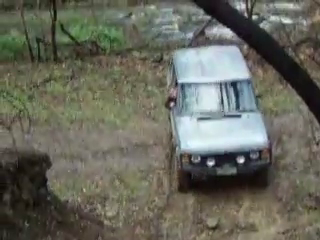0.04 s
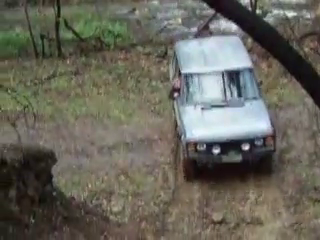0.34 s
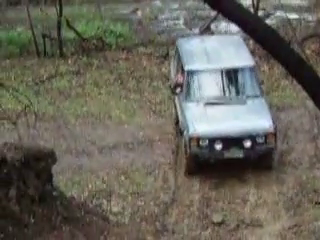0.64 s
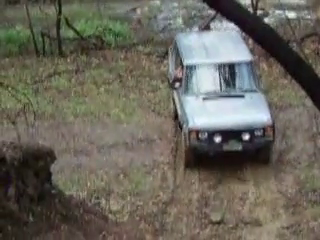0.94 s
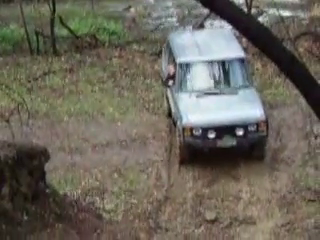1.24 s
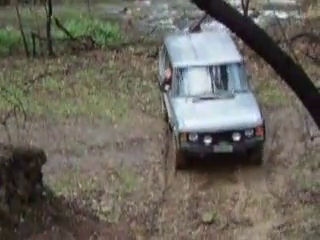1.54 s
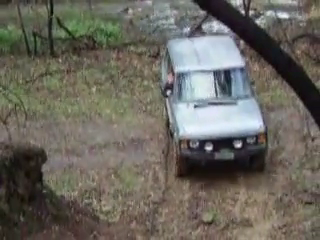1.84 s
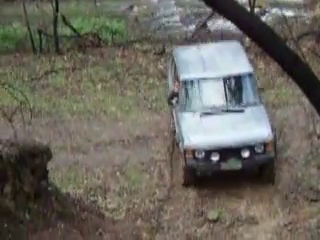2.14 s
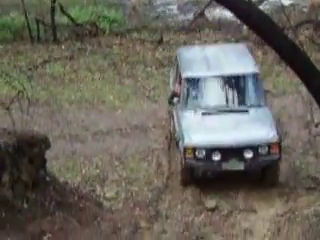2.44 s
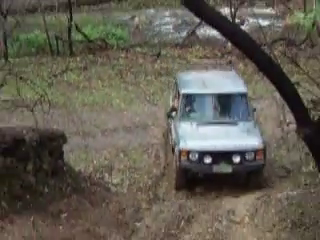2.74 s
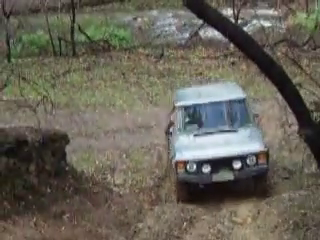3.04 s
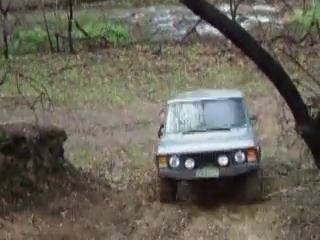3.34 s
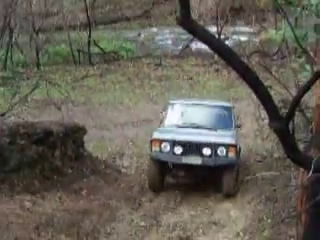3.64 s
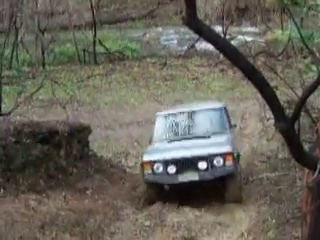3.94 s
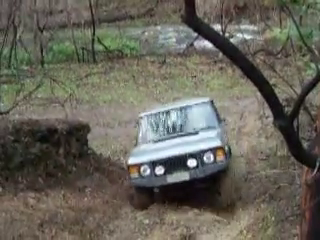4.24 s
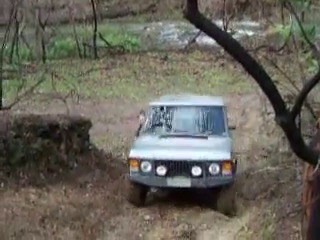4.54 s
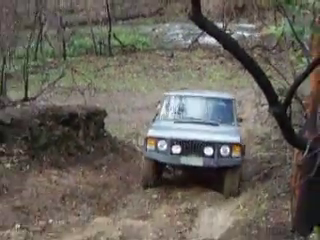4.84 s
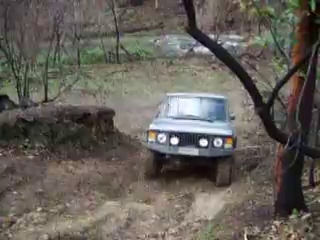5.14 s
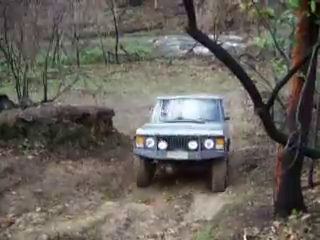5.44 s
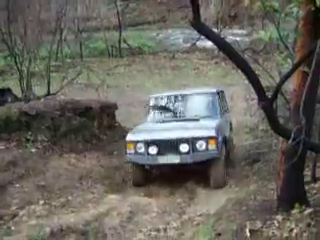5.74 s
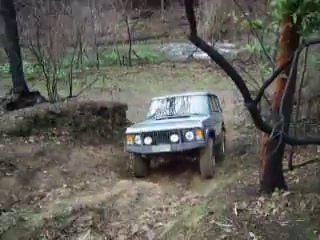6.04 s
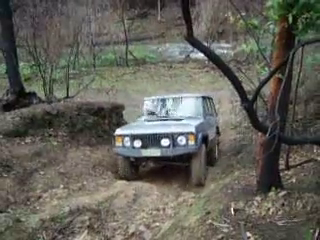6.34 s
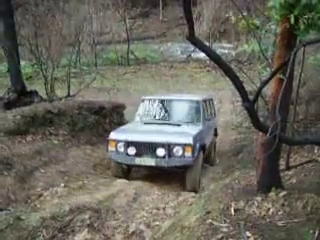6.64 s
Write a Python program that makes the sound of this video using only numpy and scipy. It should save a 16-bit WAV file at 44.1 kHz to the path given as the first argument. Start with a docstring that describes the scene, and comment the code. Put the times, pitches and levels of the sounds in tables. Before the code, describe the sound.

A four-wheel-drive truck's large petrol engine lopes at low revs outdoors, with an uneven burble and a few small pushes of the throttle. Engine clatter, fan rush and tyres churning mud accompany it, over a very faint stream. At about 2 seconds the throttle snaps open and the engine barks, overloading the microphone with a quick cluster of clicks until about 2.4 seconds. The revs climb steeply to a peak near 3.2 seconds, then sag a little and waver under load as the truck comes nearer and grows louder. From about 5 seconds the revs rise again and the exhaust howls, loudest near 6 seconds, while light gusts thud softly on the microphone. After that a lower throb grows in the exhaust, and the engine is still revving high at the end, near 7 seconds. The overall sound has little treble.

```python
"""A petrol V8 truck lopes at the foot of a muddy hill: its two banks fire unevenly, so the exhaust sounds many
multiples (orders) of the engine cycle. The bay clatters, the fan rushes and tyres churn mud over a faint
stream. Near 2 s the throttle snaps open, the engine barks and a burst of sharp clicks sounds. The truck revs up
the track, louder as it nears, and light gusts nudge the microphone. From about 5 s the exhaust howls; at the
top the truck swings sideways and the beat of one bank grows."""
import sys
import numpy as np
from scipy import signal
from scipy.fft import rfft, irfft, next_fast_len
from scipy.io import wavfile
from scipy.ndimage import uniform_filter1d

SR = 44100
rng = np.random.default_rng(int(sys.argv[2]) if len(sys.argv) > 2 else 0)


def waveform_to_disk(signal):
    """Save audio, clipped to [-1, 1], as 16-bit WAV at the path in sys.argv[1]."""
    frames = np.transpose(np.atleast_2d(signal))
    scaled = np.clip(frames, -1, 1) * 32767
    samples = np.round(scaled).astype(np.int16)
    wavfile.write(sys.argv[1], SR, samples)


N = 302967
T = np.arange(N) / SR

# crank speed: (time [s], speed [rpm])
CRANK_SPEED = [(0, 1325), (.25, 1689), (.42, 1540), (.83, 1883), (1.15, 1994), (1.5, 1907), (1.7, 2180),
               (1.87, 2089), (2.2, 2809), (2.4, 3426), (2.63, 3922), (2.87, 4030), (3.1, 4448),
               (3.26, 4573), (3.5, 4177), (3.75, 3798), (4.1, 4016), (4.34, 3841), (4.55, 4025),
               (4.85, 3774), (5.2, 4013), (5.4, 4300), (5.6, 4354), (6.01, 4879), (6.25, 4736),
               (6.52, 4848), (6.86, 4770)]
# pushes on the throttle: (start [s], length [s], load [0-1])
THROTTLE_PUSHES = [(0.0, 0.21, 0.73), (.54, .22, 0.15), (1.554, 0.14, 0.81), (1.868, 0.83, 0.96),
                   (2.55, 0.45, 0.78), (2.881, 0.43, 0.95), (3.811, 0.38, 0.8), (4.378, 0.27, 0.83),
                   (4.573, .53, 0.61), (4.984, .64, 0.88), (5.502, 0.515, 0.67), (5.95, 0.24, 0.08),
                   (6.28, 0.58, 0.72)]
# the truck grows louder as it climbs nearer: (time [s], level [dB])
APPROACH = [(0, -9), (2, -6), (4.7, -1), (5.2, 3), (5.8, 4.5), (6.86, 3)]
# the eight cylinders in firing order: (bank [0 near, 1 far], strength [ratio])
CYLINDERS = [(0, 0.84), (1, 0.44), (0, .7), (0, 0.9), (1, 0.33), (0, 0.93), (1, 0.38), (1, 0.42)]
# harmonics of the uneven firing: (order [multiple of the cycle], level [dB])
ORDERS = [(2, -11.5), (3, -3.5), (4, -5), (6, -2), (7, 2.5), (9, 5.5), (10, 4.5), (11, 6.5), (12, 6.5),
          (13, 11.5), (14, 2), (15, 10), (16, 8), (17, 7.5), (18, 5), (19, 5), (20, 9), (21, 2.5),
          (22, 4.3), (23, -2.1), (24, 1.5), (25, 5), (26, -9.5), (27, -2.5), (28, -2.5), (29, -12.5),
          (30, -5), (31, -18), (32, -9.5)]
# broad response of pipe and silencer: (frequency [Hz], gain [dB])
PIPE_RESPONSE = [(40, -5), (80, 8), (130, 2), (170, 7.5), (200, 11), (225, 8.5), (255, 5.5), (300, -2.5),
                 (370, -2), (450, -13), (520, -6), (620, -6.5), (720, -7), (850, -3), (1050, 0),
                 (1300, -4.5)]
# narrow pipe resonances, excited as orders sweep by: (frequency [Hz], width [Hz], gain [dB])
PIPE_MODES = [(192.2, 14, 3.5), (220.3, 26, -3.5), (250, 8.1, 1.5), (548, 25, 3), (635.4, 20, 3.5),
              (671, 36, -5), (769, 18, 2), (793, 22, 8.5), (913, 39, 4.5), (1017, 28, 7.5)]
# response of the pipe to the firing tone: (frequency [Hz], gain [dB])
FIRING_RESPONSE = [(90, -34), (110, 2.5), (130, -1.5), (160, -14.5), (200, 1), (250, -2.5), (285, 0),
                   (305, -6.5), (325, -8.5)]
# response of the pipe to the slower beat of one bank: (frequency [Hz], gain [dB])
BEAT_RESPONSE = [(65, -26.5), (80, -25.5), (90, -20), (120, -12.5), (150, -14), (170, -7.5), (180, -4),
                 (190, -5.5), (200, -1)]
# ringing panels and covers: (frequency [Hz], width [Hz], gain [dB])
PANEL_MODES = [(523.3, 17, 1.5), (647, 120, 3), (798, 170, -0.5), (1704, 39, 4), (1896, 50, 5.5),
               (2846, 45, 5), (3070, 370, 1.5), (3730, 90, 3.5)]
# noise of the engine bay: (frequency [Hz], level [dB])
BAY_SPECTRUM = [(400, -29), (900, -16.5), (1200, -10), (1460, -13.5), (1800, -10.5), (2170, -13),
                (2450, -10.5), (3000, -12.5), (3400, -15), (3780, -18.5), (4000, -28), (4300, -30),
                (5000, -58)]
# churned mud: (frequency [Hz], level [dB])
MUD_SPECTRUM = [(30, -21.5), (60, -17), (90, 4), (150, 3), (300, 5), (450, -7.5), (620, -3.5), (820, 2),
                (1100, -6), (1500, -15.5), (2500, -26.5)]
# the stream beyond the track: (frequency [Hz], level [dB])
STREAM_SPECTRUM = [(30, -11), (70, -10), (300, 0), (480, 2), (620, 2.5), (800, -7.5), (1100, -10.5),
                   (1500, -25), (3000, -20), (5000, -35)]
# sharp clicks around the bark: (time [s], snap height [amplitude], tick level [dB])
OVERLOAD_CLICKS = [(2.145, 0.96, -71), (2.17, 0.45, -23), (2.1843, 0.75, -30), (2.1885, 0.93, -34),
                   (2.2005, 1, -28), (2.2278, 0.8, -74), (2.3641, .65, -20)]
# booms with the throttle shut at cruising speed: (order [multiple of the cycle], boost [dB])
OVERRUN_BOOMS = [(3, 10), (4, 7), (6, 13), (7, 5.5), (9, -0.5), (10, 5.5), (11, 7.5)]
# wind on the microphone: (time [s], half length [s], level [dB])
GUSTS = [(3.46, 0.022, -36), (5.261, .06, -30), (5.7, 0.25, -37.5), (6.513, 0.33, -40)]
# the exhaust howls under strain: (time [s], half length [s], frequency [Hz], boost [dB])
HOWLS = [(5.601, 0.63, 847, 14), (5.78, .12, 586.7, 9.5), (6.138, 0.29, 641, 9), (6.68, .2, 890, 8.5)]

CRUISE_RPM = 4000
# level laws: (level at full load and cruising speed [dB], rise per doubling of speed [dB],
# loss off throttle [dB], share of the approach [ratio])
FIRING_LAW = (-6, 2.5, 20.5, 0.25)
BEAT_LAW = (-15.5, 1.5, -0.5, -0.36)
BURBLE_LAW = (-33, 8, 3.5, 0.47)
RASP_LAW = (-33, -2.5, 6.0, 1.08)
BAY_LAW = (-22, 3.5, 5, 1.1)
TYRE_LAW = (-22, 2.5, 4.5, 1.0)
BARK_ORDER, BARK_BOOM_DB, BARK_BURBLE_DB, BARK_BAY_DB = 11, 16.5, 3.5, 3.5


def undb(db):
    """Amplitude ratio of a level in decibels."""
    return 10 ** (np.asarray(db) / 20)


def walk(rate_hz, t=T):
    """Random modulation: Gaussian values joined by straight lines, with a spread near 1."""
    return 1.37 * np.interp(t * rate_hz, np.arange(2048), rng.standard_normal(2048))


def response(spectrum, hz):
    """Frequency response: gain from levels interpolated over log frequency."""
    points_hz, db = np.transpose(spectrum)
    return undb(np.interp(np.log(hz + 1), np.log(points_hz), db))


def resonances(modes, hz):
    """Resonance: each mode adds a bell-shaped peak or dip to the gain."""
    return undb(sum(db / (1 + (2 * (hz - centre) / width) ** 2) for centre, width, db in modes))


def colour(source, spectrum, modes=PANEL_MODES):
    """Source and filter: a broad spectrum and narrow modes shape the source; the result has rms 1."""
    size = next_fast_len(N)
    hz = np.arange(size // 2 + 1) * SR / size
    shaped = irfft(rfft(source, size) * response(spectrum, hz) * resonances(modes, hz), size)[:N]
    return shaped / np.sqrt(np.mean(shaped ** 2))


def throttle(t, attack_s=0.12, release_s=0.15):
    """Load envelope, 0-1: each push rises, holds and falls away."""
    return np.max([load * np.clip(np.minimum((t - s) / attack_s, (s + length - t) / release_s) + .5, 0, 1)
                   for s, length, load in THROTTLE_PUSHES], axis=0)


def driving(t, inertia_s=.07):
    """Crank speed, smoothed by flywheel inertia, with the load and the level of the approach."""
    rpm = uniform_filter1d(np.interp(T, *np.transpose(CRANK_SPEED)), int(inertia_s * SR))
    return np.interp(t, T, rpm), throttle(t), np.interp(t, *np.transpose(APPROACH))


def level_db(law, rpm, load, near_db):
    """Level of a source: a power law of speed, shifted by load and nearness."""
    full_db, speed_db, lift_db, share = law
    return full_db + speed_db * np.log2(rpm / CRUISE_RPM) - lift_db * (1 - load) + share * near_db


def pipe_phase(order, hz, far_lag_s=0.00462, boom_hz=200, boom_width_hz=40):
    """Superposition: the puffs of both banks set an order's phase, and the pipe's resonance shifts it."""
    puffs = sum(size * np.exp(-2j * np.pi * (order * slot / len(CYLINDERS) + bank * hz * far_lag_s))
                for slot, (bank, size) in enumerate(CYLINDERS))
    return np.angle(puffs) - np.arctan(2 * (hz - boom_hz) / boom_width_hz)


def firing_tones(t, rpm, load, near_db, roughness=0.068, waver_db=1.5):
    """Periodic excitation: eight firings a cycle give order 8; one bank's uneven gaps beat at order 5."""
    tones = [(8, FIRING_LAW, FIRING_RESPONSE, roughness, 0),
             (5, BEAT_LAW, BEAT_RESPONSE, 2 * roughness, swing_db(t))]
    partials = []
    for order, law, spectrum, rough, aim_db in tones:
        db = level_db(law, rpm, load, near_db) + aim_db
        db += waver_db * (1 - load) * walk(14, t)  # steady only under load
        partials.append((order, undb(db) * response(spectrum, order * rpm / 120), rough))
    return partials


def burble_and_rasp(t, rpm, load, near_db, burble_rough=.19, rasp_rough=.22, drift_db=3.5):
    """Harmonic series: uneven firing feeds many orders, which the pipe and the panels filter."""
    burble_db = level_db(BURBLE_LAW, rpm, load, near_db) + BARK_BURBLE_DB * bark(t, stretch=2.3)
    rasp_db = level_db(RASP_LAW, rpm, load, near_db)
    partials = []
    for order, db in ORDERS:
        hz = order * rpm / 120
        rasp_share = np.clip((hz - 350) / 150, 0, 1)  # burble turns to rasp above the silencer's boom
        db += burble_db * (1 - rasp_share) + rasp_db * rasp_share
        db += drift_db * walk(4, t) * np.sqrt(rpm / CRUISE_RPM)  # the idle chugs more evenly
        db += BARK_BOOM_DB * bark(t) * (order == BARK_ORDER)
        db += overrun_db(t, order, rpm, load) + howl_db(t, hz)
        gain = undb(db) * response(PIPE_RESPONSE, hz)
        gain *= resonances(PIPE_MODES, hz) * resonances(PANEL_MODES, hz)
        partials.append((order, gain, burble_rough * (1 - rasp_share) + rasp_rough * rasp_share))
    return partials


def exhaust(cycle, flutter_hz=24, drift_rad=0.55):
    """Quasi-periodic sum of orders: no two cycles burn alike, so amplitude and phase flutter."""
    t = T[::100]  # envelopes vary slowly
    state = driving(t)
    cycle_hz = state[0] / 120
    sound = np.zeros(N)
    for order, gain, rough in firing_tones(t, *state) + burble_and_rasp(t, *state):
        flutter = 1 + rough * (walk(flutter_hz, t) + 1j * walk(flutter_hz, t))
        phase = pipe_phase(order, order * cycle_hz) + drift_rad * walk(5, t)
        envelope = np.interp(T, t, gain * flutter * np.exp(1j * phase))
        angle = 2 * np.pi * order * cycle
        sound += envelope.real * np.cos(angle) + envelope.imag * np.sin(angle)
    return sound


def clatter(cycle, gain_db=-3.5, ring_s=0.0067, scatter_db=2):
    """Impulse response: each cylinder knocks the block and excites its own damped ring."""
    count = len(CYLINDERS)
    firing = np.floor(count * cycle).astype(int)
    onsets = np.flatnonzero(np.diff(firing))
    strength = undb(scatter_db * rng.standard_normal(4096))[:len(onsets)]
    age = T[:2048]
    sound = np.zeros(N)
    for cylinder in range(count):
        knocks = np.zeros(N)
        knocks[onsets] = strength * (firing[onsets] % count == cylinder)
        ring = rng.standard_normal(len(age)) * np.exp(-age / ring_s)
        sound += signal.oaconvolve(knocks, ring)[:N]
    return undb(gain_db) * colour(sound, BAY_SPECTRUM)


def fan(cycle, gain_db=-0.5, chuff=0.14, lope=0.046):
    """Amplitude modulation: the fan's rush pulses at every second firing and once a cycle."""
    pulsing = 1 + chuff * np.cos(np.pi * len(CYLINDERS) * cycle) + lope * np.cos(2 * np.pi * cycle)
    return undb(gain_db) * colour(rng.standard_normal(N) * pulsing, BAY_SPECTRUM)


def intake(bay, rpm, centre_hz=1600, width_hz=1600, db_per_doubling=2.5):
    """Flow noise: the middle band of the bay swells with speed as more air is drawn in."""
    band = signal.lfilter(*signal.iirpeak(centre_hz, centre_hz / width_hz, fs=SR), bay)
    return bay + band * (undb(db_per_doubling * np.log2(rpm / CRUISE_RPM)) - 1)


def tyres(gain_db=-0.5, patchy_db=0.44):
    """Randomly modulated noise: the tread churns wet earth in uneven patches."""
    return undb(gain_db + patchy_db * walk(24)) * colour(rng.standard_normal(N), MUD_SPECTRUM)


def stream(gain_db=-44):
    """Broadband flow noise: water rushes almost steadily in the distance."""
    return undb(gain_db + walk(10)) * colour(rng.standard_normal(N), STREAM_SPECTRUM, modes=[])


def bark(t, stretch=1, peak_s=2.16, half_s=0.13):
    """Transient envelope, 0-1: the engine barks once as the throttle is snapped wide open."""
    return np.exp(-((t - peak_s) / (stretch * half_s)) ** 2)


def overload_clicks(pressure, snap_s=0.00011, tick_s=.00003):
    """Impulses at set times: a snap opposing the pressure, and a shorter, brighter tick."""
    snaps, ticks = np.zeros(N), np.zeros(N)
    for s, height, tick_db in OVERLOAD_CLICKS:
        snaps -= height * np.sign(pressure[int(s * SR)]) * np.exp(-((T - s) / snap_s) ** 2)
        ticks += undb(tick_db) * np.exp(-((T - s) / tick_s) ** 2)
    return snaps, ticks


def overrun_db(t, order, rpm, load, build_s=.34):
    """Gradual build-up: certain low orders boom during a long lift of the throttle at speed."""
    lift = uniform_filter1d(1 - load, int(build_s / t[1]))
    return dict(OVERRUN_BOOMS).get(order, 0) * lift ** 2 * np.minimum(rpm / CRUISE_RPM, 1) ** 3


def wind():
    """Low-frequency pressure fluctuation: gusts thud softly on the microphone."""
    swell = sum(undb(db) * np.exp(-((T - s) / half) ** 2) for s, half, db in GUSTS)
    spectrum = [(10, -16.5), (30, 4.0), (50, -1.0), (100, -23.5), (400, -48.5)]
    return swell * colour(rng.standard_normal(N), spectrum, modes=[])


def howl_db(t, hz, width_hz=61):
    """Narrow-band emphasis: as the engine strains uphill, an order within a howl's band swells."""
    return sum(db * np.exp(-((t - s) / half) ** 2 - (2 * (hz - centre) / width_hz) ** 2)
               for s, half, centre, db in HOWLS)


def swing_db(t, start_s=6.03, length_s=.5, rise_db=6):
    """Directivity: the truck swings sideways and its bank beat comes through louder."""
    return rise_db * np.clip((t - start_s) / length_s, 0, 1)


def scene(bay_lead_s=0.009):
    """Superposition: exhaust, bay and tyres follow one crank speed; wind and stream add to them."""
    rpm, load, near_db = driving(T)
    cycle = np.cumsum(rpm / 120) / SR  # a four-stroke cycle takes two turns of the crank
    pipe = exhaust(cycle)
    bay_load = throttle(T + bay_lead_s)  # the bay answers the throttle just before the pipe
    bay_db = level_db(BAY_LAW, rpm, bay_load, near_db) + BARK_BAY_DB * bark(T)
    bay = undb(bay_db) * intake(clatter(cycle) + fan(cycle), rpm)
    mud = undb(level_db(TYRE_LAW, rpm, load, near_db)) * tyres()
    return (pipe + bay + mud + wind() + stream())[None]


def record(dry, ceiling=0.75, clip_at=.715, band_hz=4300, top_hz=15800):
    """Saturation and band limiting: the microphone flattens peaks; only its ticks keep their treble."""
    squashed = dry / (1 + (dry / ceiling) ** 6) ** (1 / 6)
    snaps, ticks = overload_clicks(dry[0])
    band_lowpass = signal.firwin(201, band_hz, window=("kaiser", 7), fs=SR)
    narrow = signal.fftconvolve(squashed + snaps, band_lowpass[None], "same")
    top_lowpass = signal.ellip(8, .2, 70, top_hz, fs=SR, output="sos")
    return signal.sosfilt(top_lowpass, np.clip(narrow, -clip_at, clip_at) + ticks)


dry = scene()
out = record(dry)
waveform_to_disk(out)
```